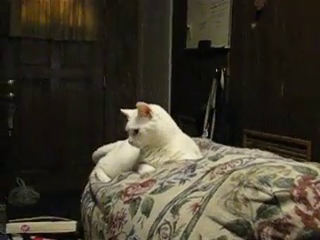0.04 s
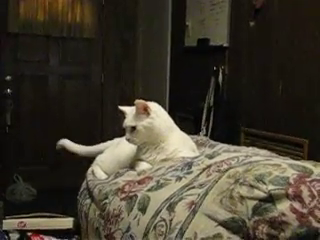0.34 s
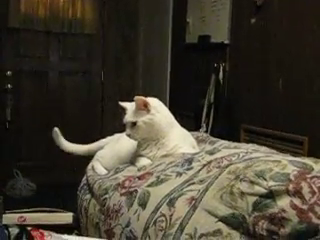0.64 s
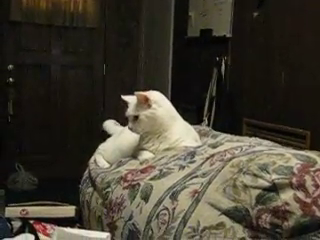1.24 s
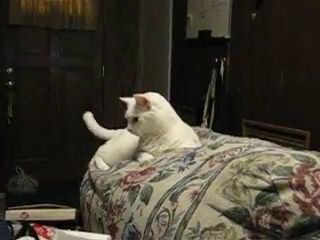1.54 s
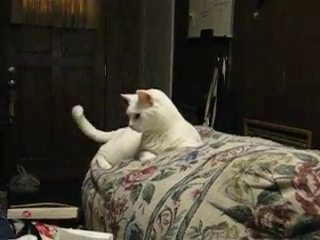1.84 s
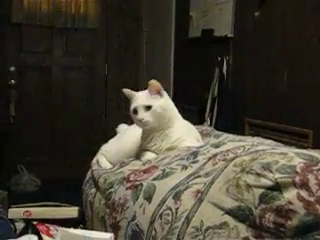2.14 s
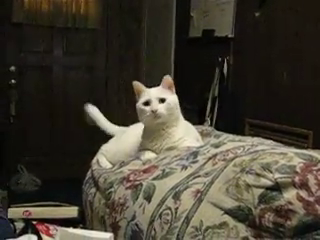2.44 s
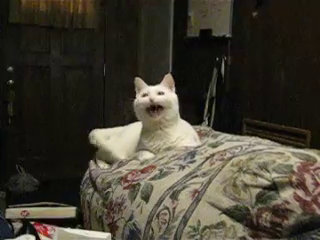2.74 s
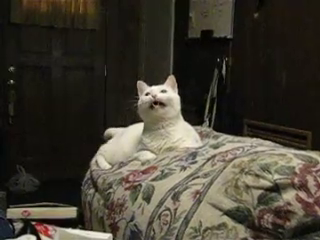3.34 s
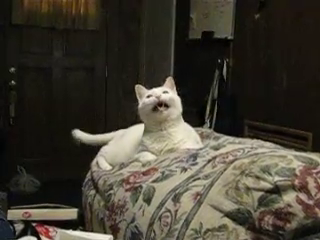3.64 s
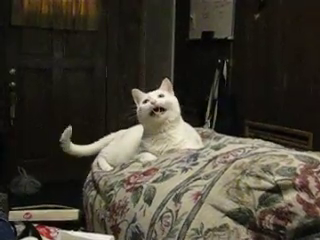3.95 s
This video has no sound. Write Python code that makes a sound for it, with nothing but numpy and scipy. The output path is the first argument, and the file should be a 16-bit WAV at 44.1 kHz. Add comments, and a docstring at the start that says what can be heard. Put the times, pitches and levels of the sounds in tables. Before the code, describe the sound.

A cat gives one short chirp, then chatters with tiny clicks over soft room hiss.

```python
"""A quiet room with a cat on a sofa, chattering at something above it. After three soft, dull taps
its vocal folds, ringing through throat and mouth, give a thin rising whimper and one short chirp
that dips in pitch and turns raspy. Teeth and tongue click and the wet mouth smacks among tiny squeaks.
Behind it are soft hiss, a low motor hum and the thin electrical whine of a camera."""
import sys
import numpy as np
from scipy import signal
from scipy.fft import rfft, irfft
from scipy.io import wavfile
from scipy.ndimage import uniform_filter1d

SR = 44100
rng = np.random.default_rng(int(sys.argv[2]) if len(sys.argv) > 2 else 0)


def digitize_waveform(pressure):
    """Quantize a signal to 16-bit integers and store it at the path in sys.argv[1].

    Rows of a 2-D input are taken as channels; values are limited to [-1, 1].
    """
    field = np.atleast_2d(pressure).T
    bounded = np.clip(field, -1, 1)
    quanta = np.round(bounded * 32767).astype(np.int16)
    wavfile.write(sys.argv[1], SR, quanta)


N = 176400
TIME_S = np.arange(N) / SR
FREQS_HZ = np.maximum(np.fft.rfftfreq(N, 1 / SR), 1)


def from_db(db):
    """Decibels to gain."""
    return 10 ** (np.asarray(db) / 20)


def unit_rms(x):
    """Scale to rms 1."""
    return x / np.sqrt(np.mean(x ** 2) + 1e-20)


def over_time(points, **ends):
    """Interpolate (seconds, value) points at each sample."""
    return np.interp(TIME_S, *np.transpose(points), **ends)


def over_frequency(points):
    """Interpolate (Hz, value) points over log frequency."""
    hz, value = np.transpose(points)
    return np.interp(np.log(FREQS_HZ), np.log(hz), value)


def coloured(x, spectrum):
    """Shape noise by (Hz, dB) points; rms 1."""
    return unit_rms(irfft(rfft(x) * from_db(over_frequency(spectrum)), N))


def drift(rate_hz):
    """Random motion, mostly below rate_hz; rms 1."""
    return unit_rms(irfft(rfft(rng.standard_normal(N)) / (1 + (FREQS_HZ / rate_hz) ** 2), N))


def low_pass(x, edge_hz, order=4):
    """Butterworth treble cut."""
    return signal.sosfilt(signal.butter(order, edge_hz, fs=SR, output="sos"), x)


def pan(x, left_db):
    """Stereo, with the left side left_db above the right."""
    return x * from_db([[left_db / 2], [-left_db / 2]])


def swell(start_s, length_s, edge_share):
    """Rise, hold and fall; each ramp takes edge_share of the length."""
    progress = (TIME_S - start_s) / length_s
    ramp = np.minimum(progress, 1 - progress) / edge_share
    return np.sin(np.pi / 2 * np.clip(ramp, 0, 1))


def resonate(x, modes):
    """Parallel resonances of alternating sign. Each mode: centre in Hz, width in Hz, gain in dB."""
    out = 0
    for k, (hz, width_hz, db) in enumerate(modes):
        radius = np.exp(-np.pi * width_hz / SR)
        feedback = [1, -2 * radius * np.cos(2 * np.pi * hz / SR), radius ** 2]
        ring = signal.lfilter([1, 0, -1], feedback, x + 1e-18)
        out = out + (-1) ** k * from_db(db) * (1 - radius ** 2) / 2 * ring
    return out


def strike(times_s, peaks_db, modes):
    """Sharp contacts ring a body, each up to its peak level."""
    impulses = np.zeros(N)
    impulses[(np.asarray(times_s) * SR).astype(int)] = from_db(peaks_db)
    ring_peak = np.abs(resonate(signal.unit_impulse(256), modes)).max()
    return resonate(impulses, modes) / ring_peak


def tone(hz, db, unsteady_share, waver_hz=10.8):
    """A sine with a share of its power wavering in level and phase."""
    waver = drift(waver_hz) + 1j * drift(waver_hz)
    amplitude = np.sqrt(2 * (1 - unsteady_share)) + np.sqrt(unsteady_share) * waver
    return from_db(db) * np.real(amplitude * np.exp(2j * np.pi * (hz * TIME_S + rng.random())))


def room_hiss(level_db=-53.5, flicker_db=0.24, right_lag_s=0.00008):
    """Soft noise that widens toward the treble and reaches the left first."""
    # Each row: frequency in Hz, relative density in dB.
    spectrum = [(20, -11), (40, -1.5), (120, 1.5), (270, -0.5), (480, 2.5), (640, 1), (830, -2), (1060, 1),
                (1330, -4.5), (1620, -3), (1760, 1), (1950, -5), (2400, -4), (4200, -8.5), (7000, -11.5),
                (9500, -18), (15500, -25.5)]
    # Each row: frequency in Hz, left-right correlation.
    correlation = [(100, 0.98), (350, 0.9), (700, 0.73), (1300, 0.62), (2400, 0.58), (4400, 0.3),
                   (8000, 0.14), (14000, 0.11)]
    alike = over_frequency(correlation)
    mid, side = rfft(rng.standard_normal((2, N)))
    stereo = np.sqrt(1 + alike) * mid + np.sqrt(1 - alike) * side * [[1], [-1]]
    lag = np.exp(-2j * np.pi * FREQS_HZ * [[0], [right_lag_s]])
    noise = coloured(irfft(lag * stereo, N), spectrum)
    return from_db(level_db + flicker_db * drift(rate_hz=6.8)) * noise


def motor_hum():
    """Low motor tones, some steady, some wavering."""
    # Each row: frequency in Hz, level in dB, unsteady share of the power.
    partials = [(150.8, -74, 0.9), (192.9, -59, 0.04), (232.3, -65.5, 0.98), (283, -67.5, 1),
                (311.1, -61, 0.26), (431.3, -70.5, 0.82)]
    return sum(tone(*row) for row in partials)


def electrical_whine(whine_hz=8511.5, whine_db=-65, mains_hz=59.94, depth=0.08, swing_rad=0.72):
    """A whine modulated at mains rate, faint near-steady tones and a wandering whistle."""
    # Each entry: frequency of a faint tone in Hz.
    tones_hz = [1087, 1410, 1539.5, 1723, 15315, 15734]
    tones_db = [-77, -73, -71.5, -77, -87.5, -73.5]
    tones = sum(tone(hz, db, unsteady_share=0.05) for hz, db in zip(tones_hz, tones_db))
    saw = uniform_filter1d(2 * (TIME_S * mains_hz % 1) - 1, size=60)
    carrier = np.sin(2 * np.pi * whine_hz * TIME_S - swing_rad * saw)
    whine = from_db(whine_db) * unit_rms((1 + depth * saw) * carrier)
    whistle_hz = 12590 + 51 * drift(rate_hz=8)
    whistle = from_db(-80) * unit_rms(np.sin(2 * np.pi * np.cumsum(whistle_hz) / SR))
    return pan(whine, left_db=-5.5) + tones + whistle


def dull_taps():
    """Soft contacts on a well-damped body."""
    # Each row: start in seconds, peak in dB.
    hits = [(2.136, -37), (2.306, -36.5), (2.447, -39.5)]
    # Each row: centre in Hz, width in Hz, relative gain in dB.
    body_modes = [(1110, 240, 10.5), (1830, 620, 6), (3400, 3300, -8), (5400, 540, -25)]
    return strike(*np.transpose(hits), body_modes)


def fold_phase(pitch_hz, jitter_share, jitter_hz=350):
    """Phase in radians of vocal folds that never hold their pitch exactly."""
    return 2 * np.pi * np.cumsum(pitch_hz * (1 + jitter_share * drift(jitter_hz))) / SR


def squeaks():
    """Whimper and squeaks: brief, shaky glides of the vocal folds with four harmonics."""
    # Each row: start and length in seconds, first and last pitch in Hz, harmonics 1 to 4 in dB.
    glides = [(2.555, 0.081, 932, 1186, -54.5, -63, -85, -90), (2.6, 0.061, 1140, 1296, -66, -66, -77, -88),
              (2.679, 0.012, 1420, 1314, -58, -52, -73, -85),
              (3.191, 0.024, 725, 702, -55, -71, -52.5, -58),
              (3.877, 0.017, 1526, 1517, -53.5, -42.5, -58, -68)]
    out = 0
    for start_s, length_s, first_hz, last_hz, *harmonics_db in glides:
        pitch_hz = over_time([(start_s, first_hz), (start_s + length_s, last_hz)])
        phase = fold_phase(pitch_hz, jitter_share=0.016)
        sound = sum(from_db(db) * np.sqrt(2) * np.cos(k * phase) for k, db in enumerate(harmonics_db, 1))
        out = out + swell(start_s, length_s, edge_share=0.4) * sound
    return out


def voice(pitch_hz, rasp_share, mouth_db, mouth_rasp_share=0.58, jaw_drop_s=2.82, drop_length_s=0.012):
    """Fold pulses and rasp ring the mouth and a throat that shifts as the jaw drops; level held even."""
    # Each row: centre in Hz, width in Hz, gain in dB. Throat with jaw nearly shut, then dropped; mouth.
    shut_modes = [(1030, 370, -18), (2270, 230, 2), (2830, 450, -0.5), (3380, 360, 1.5)]
    open_modes = [(940, 140, -8), (1810, 240, -4), (2770, 320, 1.5), (3750, 710, -4)]
    mouth_modes = [(4720, 530, -7.5), (5500, 960, -7), (6600, 590, -8.5), (7230, 450, -10),
                   (8440, 1100, -19.5), (12400, 1400, -29)]
    phase = fold_phase(pitch_hz, jitter_share=0.013)
    pulses = unit_rms(sum(np.cos(k * phase) for k in range(1, 14)))
    rasp = unit_rms(rng.standard_normal(N) * (1 + np.cos(phase)) ** 2)  # gated by each fold cycle
    throat_drive = np.sqrt(1 - rasp_share) * pulses + np.sqrt(rasp_share) * rasp
    mouth_drive = np.sqrt(1 - mouth_rasp_share) * pulses + np.sqrt(mouth_rasp_share) * rasp
    opening = np.clip((TIME_S - jaw_drop_s) / drop_length_s, 0, 1)
    throat = resonate(throat_drive * (1 - opening), shut_modes)
    throat += resonate(throat_drive * opening, open_modes)
    sound = low_pass(throat, edge_hz=4350) + from_db(mouth_db) * resonate(mouth_drive, mouth_modes)
    return sound / np.sqrt(uniform_filter1d(sound ** 2, size=200) + 1e-12)


def chirp(gain_db=-1, shimmer_db=1.2):
    """The main call catches once, dips in pitch and turns raspy as the mouth opens."""
    # Each row: time in seconds, pitch in Hz.
    pitch = [(2.75, 1120), (2.769, 1030), (2.775, 1095), (2.782, 1200), (2.788, 1110), (2.795, 1135),
             (2.801, 970), (2.806, 925), (2.812, 820), (2.819, 765), (2.829, 875), (2.838, 940),
             (2.85, 925), (2.866, 875), (2.884, 930)]
    # Each row: time in seconds, relative level in dB.
    envelope = [(2.748, -60), (2.767, -58), (2.769, -38.5), (2.776, -40.5), (2.78, -52), (2.786, -52),
                (2.789, -38), (2.797, -34), (2.806, -35.5), (2.817, -32), (2.824, -33.5), (2.836, -33),
                (2.842, -37), (2.854, -40), (2.86, -45.5), (2.886, -53)]
    # Each row: time in seconds, rasp share of the power driving the throat.
    rasp = [(2.769, .45), (2.776, .15), (2.788, .3), (2.794, .08), (2.808, .09), (2.82, .13), (2.836, .17),
            (2.86, .1)]
    # Each row: time in seconds, gain of the mouth's treble in dB.
    mouth = [(2.77, -20), (2.806, -15), (2.82, -4), (2.836, 3), (2.85, 5), (2.864, -3)]
    level_db = gain_db + over_time(envelope, left=-200, right=-200)
    level_db += shimmer_db * drift(rate_hz=200)
    return from_db(level_db) * voice(over_time(pitch), over_time(rasp), over_time(mouth))


def jaw_clicks(teeth_db=-7):
    """Teeth and tongue click in a mouth cavity tuned a little differently each time."""
    # Each row: start in seconds, unfiltered jaw peak in dB, relative treble in dB, tuning ratio.
    clicks = [(2.7518, -35.5, -7, 1), (2.762, -35, -5, 0.97), (2.7693, -31.5, -5, 0.87),
              (2.7885, -34, -8, .9), (2.8189, -22, -3, 1.03), (3.2093, -40, 7, 1.02),
              (3.219, -42.5, 10, 0.9), (3.2897, -34.5, 2, 0.87), (3.292, -27, -0.5, 1.01),
              (3.2986, -39, -1, 0.9), (3.303, -37, -6, .92), (3.3551, -29.5, 1, 1.03),
              (3.3624, -32.5, -2, 0.96), (3.652, -35.5, 3, 1.04), (3.8783, -37, -6, 1.05)]
    # Each row: centre in Hz, width in Hz, relative gain in dB.
    jaw_modes = [(2210, 380, 6.5), (3290, 450, 6)]
    teeth_modes = [(4800, 1000, -8.5), (6500, 750, -12)]
    out = np.zeros(N)
    for start_s, peak_db, treble_db, tuning in clicks:
        retune = np.array([tuning, 1, 1])
        out += strike([start_s], [peak_db], retune * jaw_modes)
        out += strike([start_s], [peak_db + treble_db + teeth_db], retune * teeth_modes)
    return low_pass(out, edge_hz=7800)


def lip_smacks(grains_per_s=15000):
    """Dense grains fizz as wet lips and tongue part."""
    # Each row: start in seconds, length in seconds, gain in dB, upper edge in Hz.
    smacks = [(2.822, .032, -48, 12000), (3.178, .008, -55, 11000), (3.21, .018, -50, 6500),
              (3.294, .018, -53, 5500), (3.359, .026, -46, 13000), (3.654, .055, -61, 12000)]
    # Each row: frequency in Hz, relative density in dB.
    spectrum = [(800, -31), (1800, 2), (3000, 4.5), (5200, 5), (6500, -5), (8000, -1), (10000, -15),
                (12000, -10), (15500, -25)]
    grains = rng.standard_normal(N) * (rng.random(N) < grains_per_s / SR)
    fizz = coloured(grains, spectrum)
    return sum(from_db(db) * swell(start_s, length_s, edge_share=0.62) * low_pass(fizz, edge_hz)
               for start_s, length_s, db, edge_hz in smacks)


def saliva_ticks(width_hz=540):
    """Tiny films of saliva snap, each with one high, short ring."""
    # Each row: start in seconds, peak in dB, ring in Hz.
    snaps = [(3.1812, -39, 6700), (3.1835, -45, 7400), (3.6585, -50, 5000), (3.666, -45, 7000),
             (3.68, -52, 7700), (3.6905, -47, 7200)]
    return sum(strike([start_s], [db], [(hz, width_hz, 0)]) for start_s, db, hz in snaps)


def room_tail(x, t60_s=0.31, delay_s=0.004, gain_db=-10):
    """Short, dull reflections of the furnished room, different at each side."""
    t = TIME_S[:SR // 2]
    reflections = rng.standard_normal((2, len(t))) * from_db(-60 * t / t60_s) * (t > delay_s)
    response = low_pass(unit_rms(reflections) / np.sqrt(len(t)), edge_hz=7000, order=1)
    return from_db(gain_db) * signal.fftconvolve(x[None], response, axes=1)[:, :N]


def scene():
    """Cat and taps with their reflections, over hiss, hum and whine."""
    call = chirp()
    thin_calls = squeaks()
    clicks = jaw_clicks() + lip_smacks() + saliva_ticks()
    taps = dull_taps()
    direct = pan(call + thin_calls + clicks + taps, left_db=-1.2)
    tail = room_tail(call + from_db(-4) * thin_calls + from_db(2) * clicks + from_db(-7) * taps)
    background = pan(room_hiss() + motor_hum(), left_db=0.8)
    return direct + tail + background + electrical_whine()


def record(dry):
    """Steep cut of the top treble."""
    cutoff_hz = 15850
    return irfft(rfft(dry) / np.sqrt(1 + (FREQS_HZ / cutoff_hz) ** 300), N)


dry = scene()
out = record(dry)
digitize_waveform(out)
```